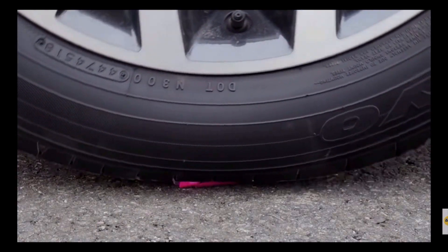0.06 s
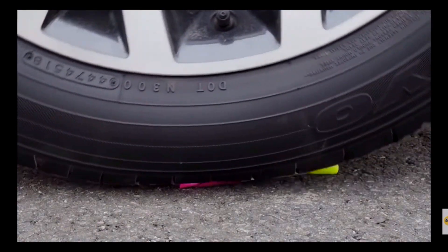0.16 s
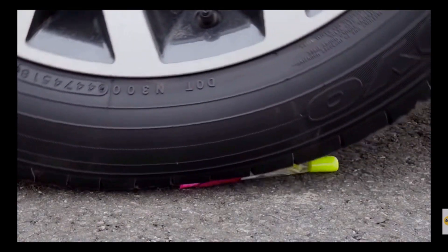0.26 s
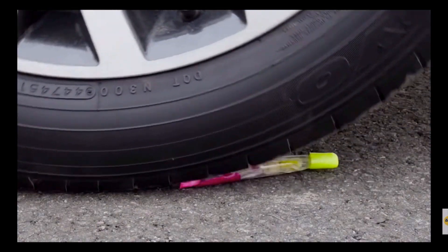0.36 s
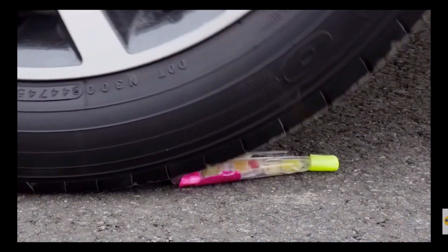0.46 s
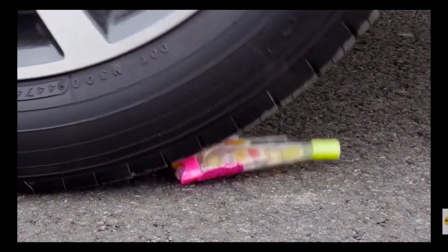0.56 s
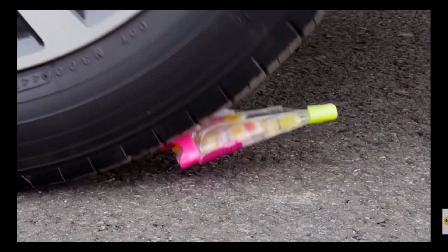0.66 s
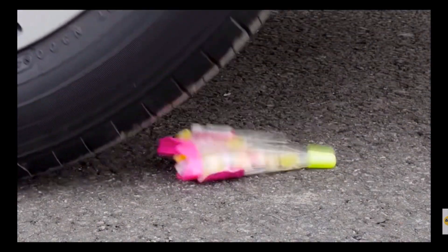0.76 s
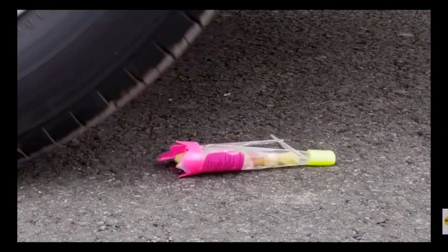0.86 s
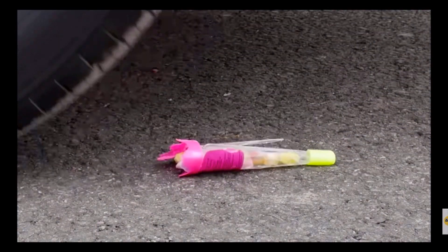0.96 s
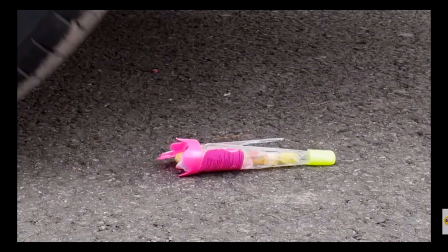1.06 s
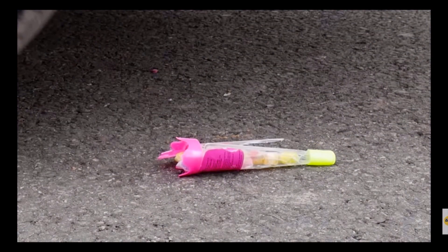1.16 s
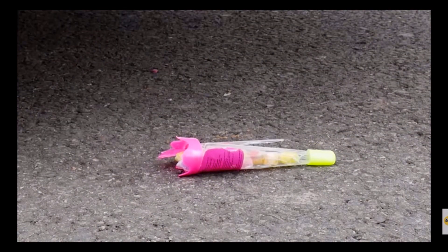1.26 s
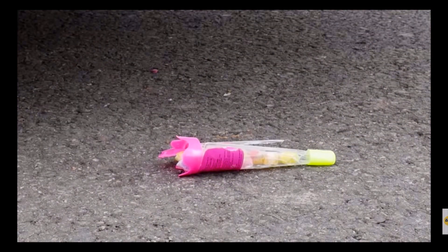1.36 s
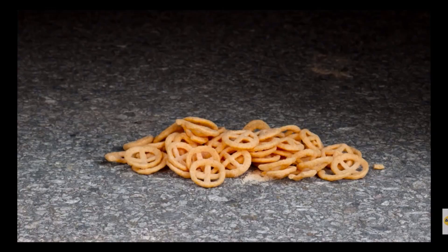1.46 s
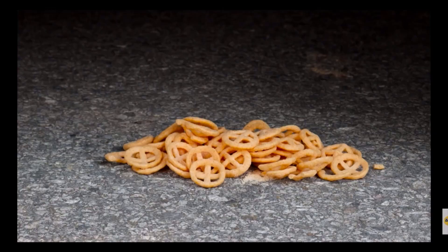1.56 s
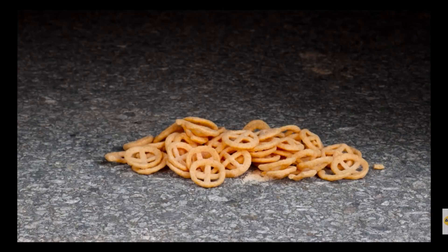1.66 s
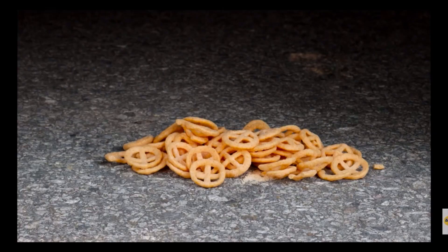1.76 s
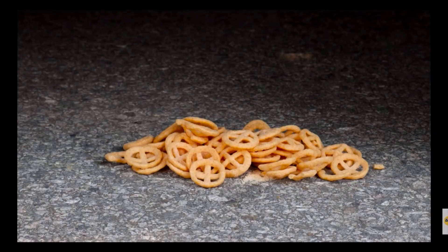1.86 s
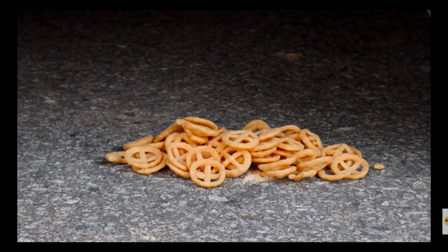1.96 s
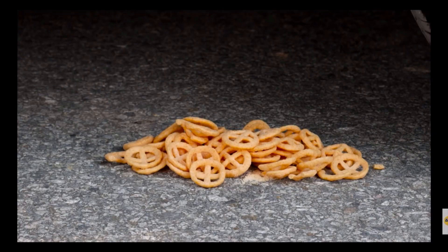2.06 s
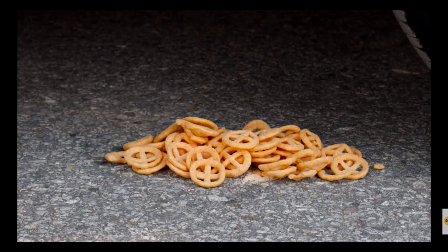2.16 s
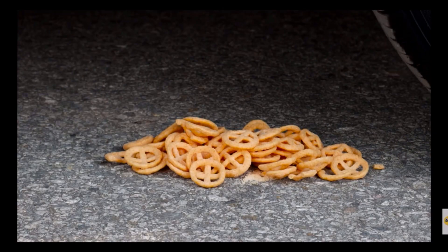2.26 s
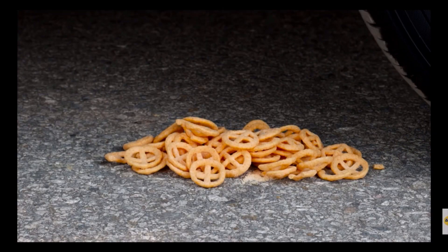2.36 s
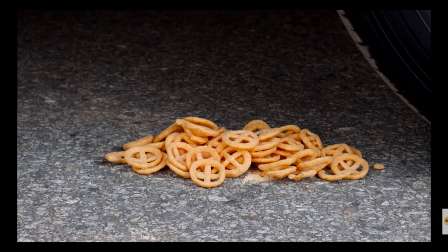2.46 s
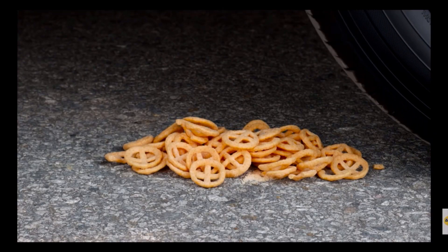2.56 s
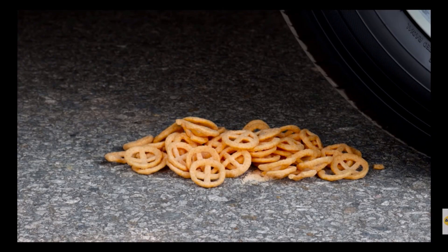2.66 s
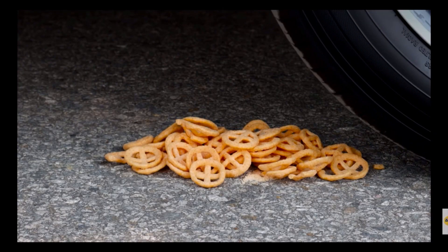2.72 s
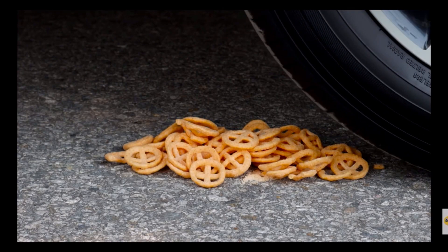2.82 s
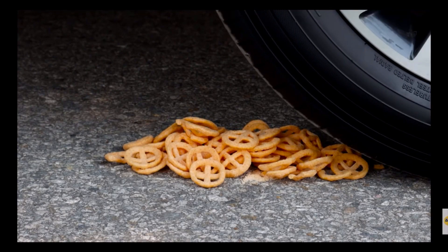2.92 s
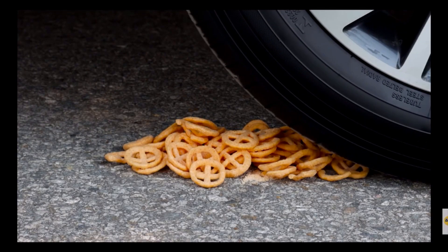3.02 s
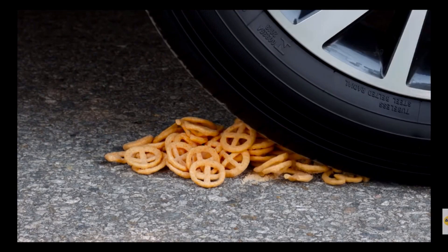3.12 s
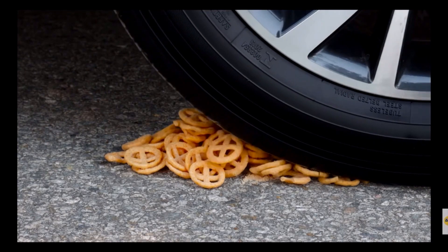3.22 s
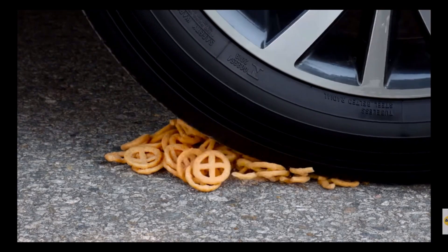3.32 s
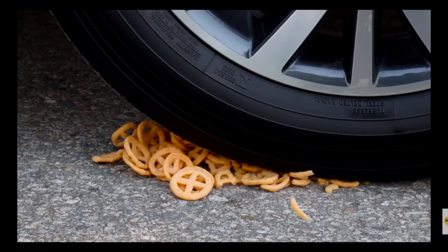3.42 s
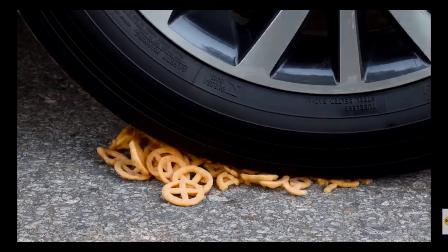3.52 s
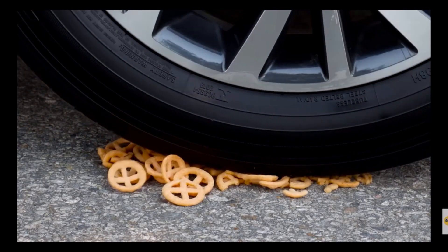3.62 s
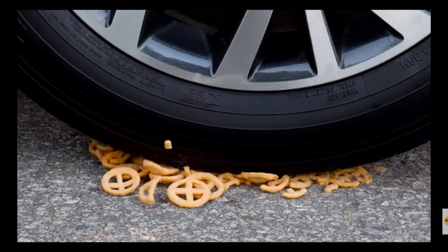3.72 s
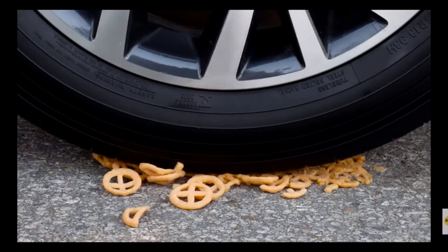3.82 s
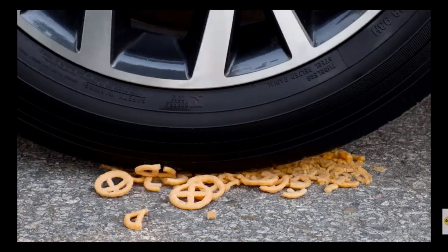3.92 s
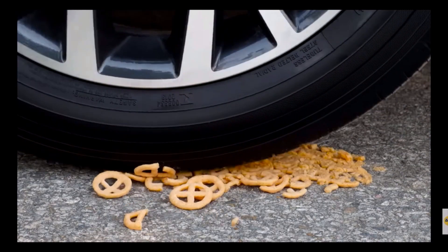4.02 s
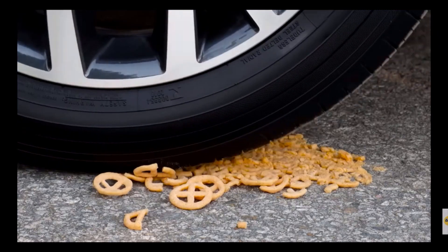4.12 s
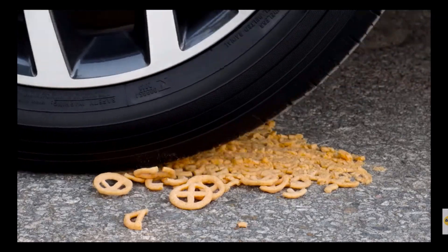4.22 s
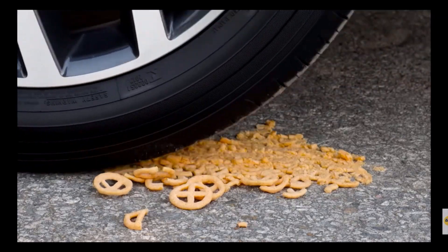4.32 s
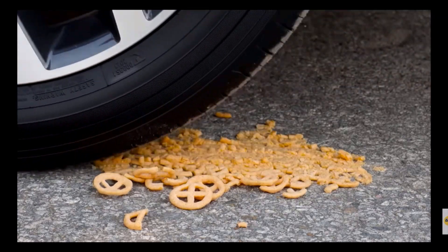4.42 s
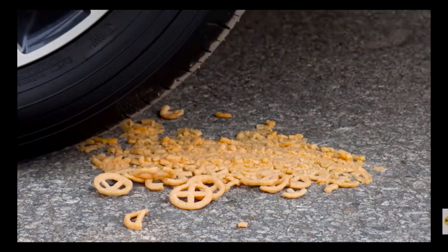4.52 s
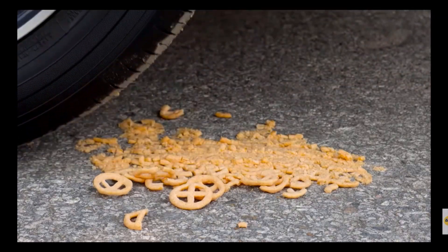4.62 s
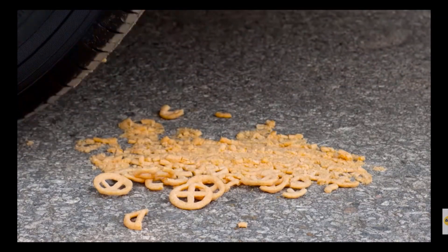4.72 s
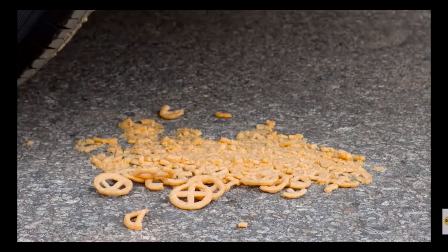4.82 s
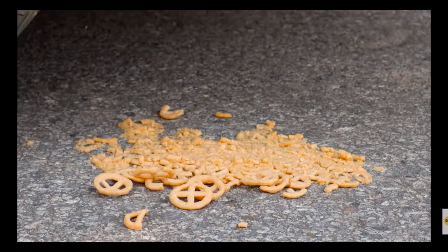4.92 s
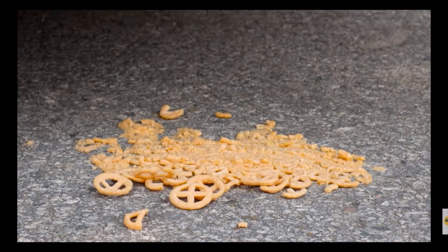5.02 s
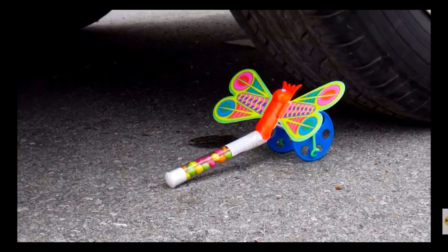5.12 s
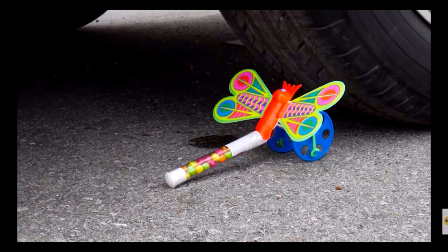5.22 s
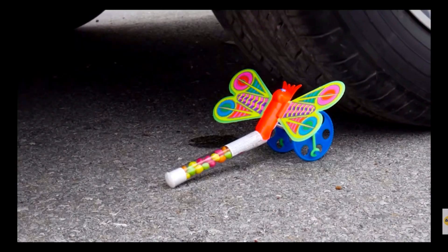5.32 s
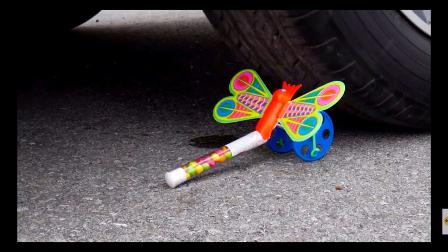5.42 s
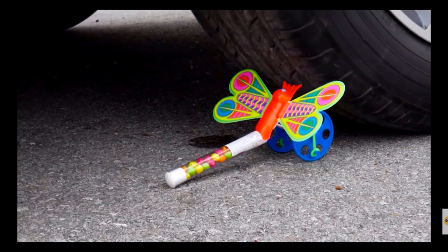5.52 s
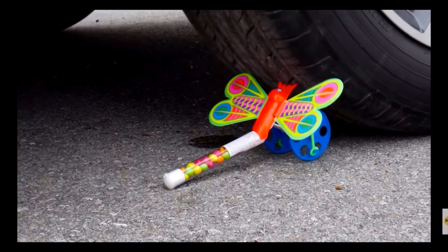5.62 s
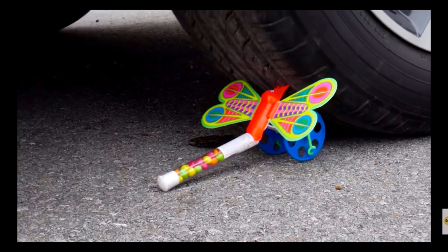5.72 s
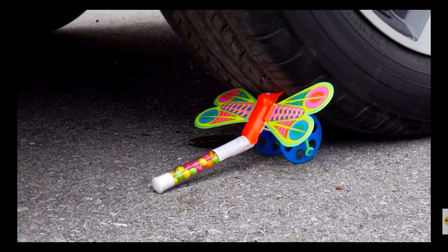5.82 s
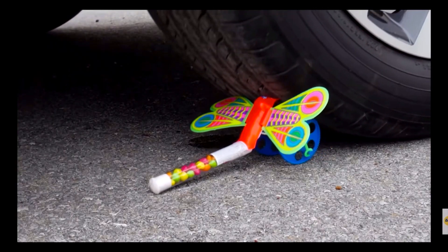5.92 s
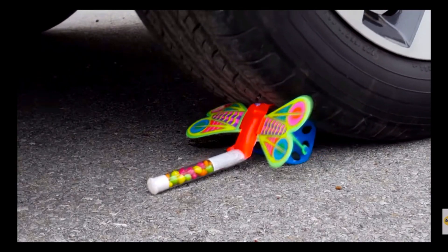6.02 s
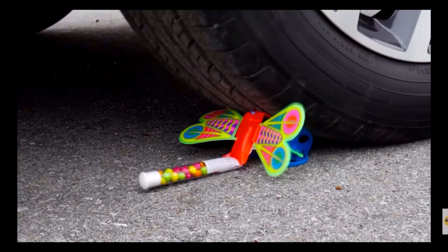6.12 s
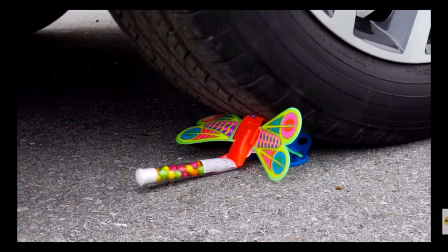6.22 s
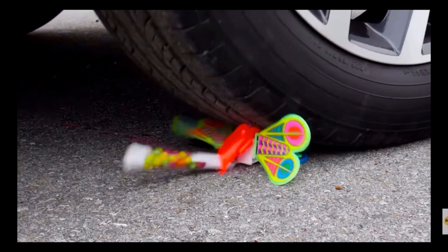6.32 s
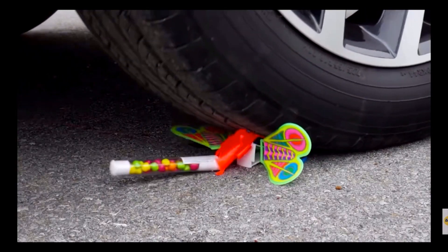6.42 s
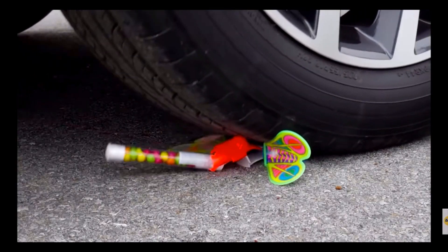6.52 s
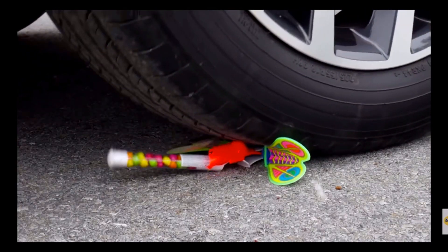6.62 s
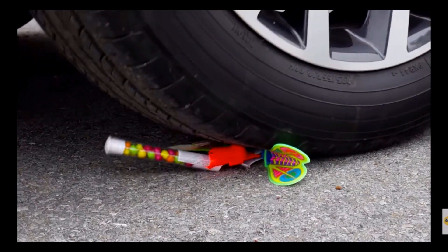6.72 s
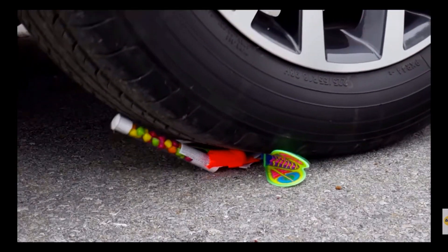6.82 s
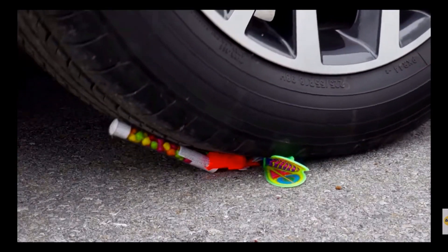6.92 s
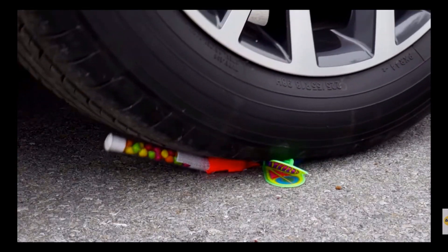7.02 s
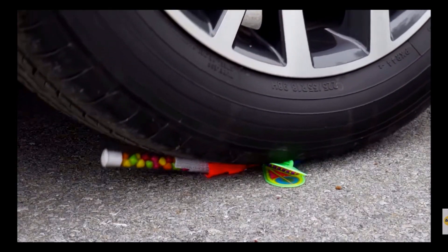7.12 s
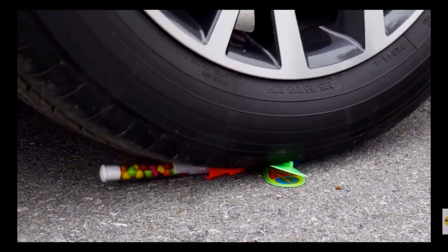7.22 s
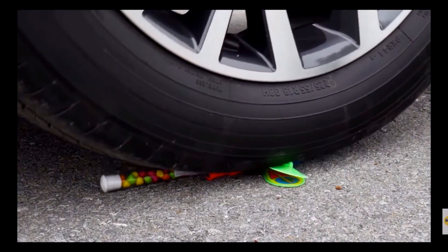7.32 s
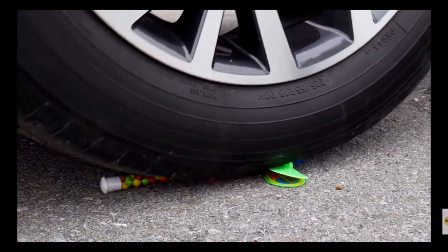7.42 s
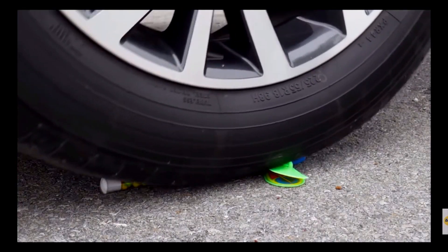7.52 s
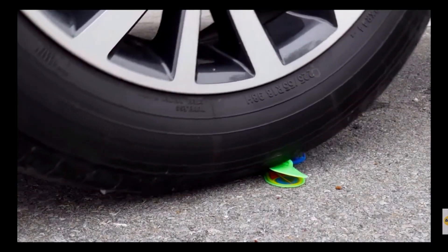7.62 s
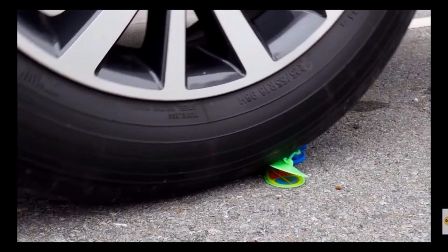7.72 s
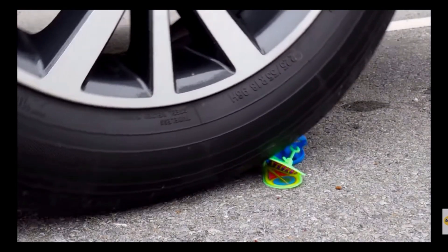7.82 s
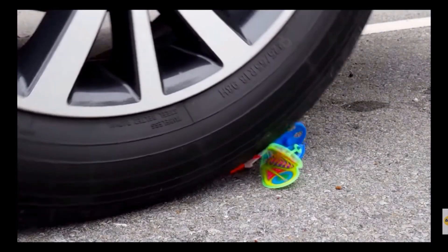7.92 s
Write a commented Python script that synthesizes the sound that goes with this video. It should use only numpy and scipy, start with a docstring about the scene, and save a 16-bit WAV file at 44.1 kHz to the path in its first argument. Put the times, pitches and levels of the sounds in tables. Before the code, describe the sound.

A car tyre rolls slowly over asphalt, grit crackling in the tread above a low rumble. It first cracks a plastic sweet tube, which springs free and clatters briefly on the ground. Next it grinds through a heap of pretzels in a loud, dense crunch. Last, a plastic toy squeaks faintly and breaks in a long run of sharp snaps. The sound is close, outdoors, with only a faint echo.

```python
"""Tyre crushing plastic and pretzels

In three scenes, one after the other, a car tyre rolls slowly over asphalt and crushes a plastic sweet tube, a
heap of pretzels and a plastic toy. Each gives way in swarms of tiny fractures and single sharp cracks; the
freed tube clatters on the ground. Underneath, grit crackles in the tread over the rumble, hum and groans of the
car. The yard adds a faint tail, and a fast limiter holds the loudest peaks."""
import sys
import numpy as np
from scipy import signal
from scipy.fft import rfft, irfft, next_fast_len
from scipy.io import wavfile
from scipy.ndimage import uniform_filter1d, minimum_filter1d

SR = 44100
rng = np.random.default_rng(int(sys.argv[2]) if len(sys.argv) > 2 else 0)


def to_wav(sig):
    """Store sig (one row per channel, or 1-D mono) as 16-bit WAV at the path in sys.argv[1].

    Samples outside -1..1 are clipped; the rate is SR.
    """
    pcm = np.clip(np.atleast_2d(sig), -1, 1) * 32767
    pcm = np.round(pcm).astype(np.int16)
    wavfile.write(sys.argv[1], SR, pcm.T)  # frames by channels


N = 351477
TIME = np.arange(N) / SR
TAPS = 2048
BINS = np.fft.rfftfreq(TAPS, 1 / SR)
BASS_HZ, SPLIT_HZ = 750, 3800  # crossovers: bass to body, body to treble
# the three scenes, one after the other, each with one object under the tyre: start_s, end_s
TUBE_PASS, PRETZEL_PASS, TOY_PASS = (0, 1.477), (1.477, 4.967), (4.967, 8)
# part of an object caves in: start_s, length_s, crunch_db, splinter_db
COLLAPSES = [(0, 0.039, -42.5, -53), (0.1, 0.032, -37.5, -48.5), (0.161, .035, -34.5, -45),
             (0.357, 0.39, -41, -55.5), (0.78, 0.18, -37, -51), (2.925, 0.05, -28, -44.5),
             (2.973, 0.059, -18.5, -37), (3.035, 1.06, -27.5, -32.5), (3.335, .05, -21, -37),
             (3.395, 0.056, -25, -38), (3.555, 0.072, -30, -33.5), (3.614, 0.052, -18.5, -32),
             (3.804, 0.045, -19.5, -37), (3.953, 0.066, -20, -42), (4.05, 0.068, -19.5, -43),
             (4.151, 0.068, -22, -38), (4.238, 0.061, -35, -49.5), (5.632, .07, -22.5, -36),
             (5.692, 0.044, -19.5, -26.5), (5.765, 0.058, -23, -33.5), (5.941, 0.1, -29.5, -43),
             (6.019, 0.026, -21, -28), (6.097, 0.13, -34, -40.5), (6.231, 0.047, -23.5, -32),
             (6.348, 0.13, -41.5, -48.5), (6.482, 0.027, -23, -33.5), (6.55, 0.12, -42, -48),
             (6.648, 0.092, -33.5, -43), (6.753, 0.055, -24.5, -33.5), (6.915, 0.15, -37.5, -46),
             (7.218, 0.11, -34.5, -46.5), (7.41, 0.035, -31.5, -46), (7.514, 0.077, -34, -43),
             (7.628, 0.033, -25.5, -37.5), (7.753, 0.015, -26, -28), (7.926, .05, -28.5, -39)]
# spectrum of a bright snap: frequency_hz, level_db
SNAP_TONE = [(1500, -22.5), (3000, -10.5), (4200, 4.5), (6500, -1), (8500, -11.5), (11000, -9.5),
             (15500, -27)]


def cracks(skirt=0.09, snap_tear=0.26, body_tear=0.4, air_hz=10500):
    """A first break and a ragged tear; the piece rings for a few cycles, damped by the rubber."""
    # single loud fractures: start_s, body_db, pitch_hz, width_octaves, snap_db
    fractures = [(.0565, -34, 2450, 0.43, -35), (.0706, -32, 1800, 2.7, -28),
                 (0.1078, -41, 1000, 0.43, -30.5), (0.1173, -14.5, 1520, 1.4, -31),
                 (.1287, -35, 1100, 1.1, -48), (0.1355, -28, 2250, 3.1, -27), (.1476, -25, 1100, 1.4, -48),
                 (.1688, -25, 2550, 0.27, -30), (0.1803, -18.5, 1500, 1.2, -27),
                 (0.2247, -38, 1900, .87, -34), (0.233, -34, 1720, .3, -34),
                 (0.2578, -12.5, 1880, 0.62, -28.5), (.3044, -28.5, 2030, .65, -39),
                 (0.3166, -26, 1300, 1.9, -40.5), (.3798, -26.5, 2500, 0.6, -37),
                 (0.4226, -27.5, 2250, 0.69, -33.5), (0.5377, -29, 2230, 0.36, -32.5),
                 (.6243, -33, 3000, 0.27, -42), (.7206, -44, 2300, .8, -46),
                 (.7765, -14.5, 2170, 0.34, -34.5), (3.044, -31, 2000, 1.2, -26.5),
                 (3.0615, -20, 2750, 0.68, -28), (3.0696, -19, 2230, .65, -28),
                 (3.0923, -18, 3000, 0.81, -29), (3.1235, -18, 2440, .54, -27.5),
                 (3.153, -24, 2400, .8, -26), (3.1675, -20, 2300, 0.68, -31), (3.2073, -19, 1800, .65, -33),
                 (3.2719, -20, 2200, 1.1, -40), (3.3367, -16, 2130, .8, -42), (3.4186, -18, 2180, 0.8, -32),
                 (3.452, -22, 2240, 0.69, -30), (3.6882, -12, 1500, 0.29, -49),
                 (3.726, -23, 1550, 0.87, -43), (3.7749, -14.5, 1300, 0.4, -41),
                 (3.8033, -17.5, 1420, 1.1, -33), (3.9673, -18.5, 1370, 1.1, -40),
                 (4.0382, -21, 1380, .9, -42), (4.078, -14.5, 1350, 1.4, -42),
                 (4.1451, -16.5, 1300, 1.2, -33), (4.1674, -16.5, 1000, 0.56, -32),
                 (4.1826, -15, 1100, 0.58, -41), (4.255, -24.5, 1960, .44, -61),
                 (4.3273, -34, 1250, 1.15, -70), (4.549, -44, 2800, 1.3, -50),
                 (5.631, -28, 2100, 0.79, -48), (5.7497, -18, 2480, 0.08, -35),
                 (5.8602, -13.5, 1700, 0.73, -35), (5.8769, -22.5, 2960, 0.55, -30.5),
                 (5.8934, -42, 2000, 1, -30.5), (6.033, -16.5, 1400, 1.6, -34),
                 (6.049, -20, 1680, 0.65, -28), (6.068, -21, 2980, .2, -33), (6.1042, -20, 2750, 0.57, -29),
                 (6.1106, -17.5, 2430, 1.05, -27), (6.1387, -11.5, 2080, 0.97, -26),
                 (6.1629, -24, 1300, 1.1, -43), (6.2488, -18, 2900, 0.66, -32),
                 (6.2932, -12.5, 2020, 0.23, -26), (6.3096, -18, 2670, .42, -26),
                 (6.335, -22, 2080, 0.5, -28), (6.356, -27.5, 1500, 0.63, -27),
                 (6.4535, -27.5, 1330, 1.8, -46), (6.488, -18.5, 1860, 0.64, -27),
                 (6.5274, -19, 2780, 0.32, -29), (6.54, -18, 2220, .46, -26.5),
                 (6.6195, -24.5, 2230, 0.44, -39), (6.709, -21.5, 2300, 0.31, -29),
                 (6.7747, -12.5, 2130, 0.82, -25.5), (6.7909, -17, 2920, .6, -26.5),
                 (6.8536, -10.5, 1720, .71, -34), (6.9187, -20, 1730, 0.71, -46),
                 (6.949, -19, 1800, .7, -25), (7.0347, -16, 3350, 1.2, -45),
                 (7.1556, -21.5, 3040, 1.2, -38), (7.2388, -28, 1950, 0.34, -36),
                 (7.3089, -20.5, 1950, 0.65, -29), (7.3778, -15, 2370, 0.25, -38),
                 (7.4221, -21.5, 1850, .47, -31), (7.4781, -28, 2800, 0.61, -30),
                 (7.502, -23.5, 1350, 1.3, -36), (7.5233, -21.5, 1820, 0.61, -36),
                 (7.5557, -22, 2050, 2.4, -31), (7.5673, -21, 1890, .51, -35),
                 (7.5754, -25, 2100, 0.52, -31), (7.6286, -18.5, 1200, 1.4, -26.5),
                 (7.6335, -19.5, 3150, 0.91, -25), (7.658, -15, 2240, 0.48, -49),
                 (7.8204, -17.5, 1950, 0.33, -41), (7.8424, -15.5, 2200, 0.3, -25.5),
                 (7.8552, -18, 2070, .22, -53), (7.8704, -21.5, 2400, 1.1, -46),
                 (7.881, -15, 1600, 0.45, -46), (7.8987, -22.5, 1780, 0.81, -32),
                 (7.9093, -20, 1880, 0.11, -33), (7.9203, -22, 1720, 0.33, -34),
                 (7.9423, -22.5, 1650, 0.74, -29)]
    # spectrum of the tyre's thud: frequency_hz, level_db
    thud_tone = [(30, -18), (110, -1.5), (300, 2), (600, 4.5), (1000, -28), (2000, -61)]
    # how each material breaks: thud_db, air_db, lone_tear_s, collapse_tear_s
    tube, pretzel, toy = (-41, -1, .0018, .002), (-48, -5, .0025, .004), (-39, -1.5, .0019, .0038)
    out, t = np.zeros(N), np.arange(TAPS) / SR
    first_break = 1. * (t == 0)
    window_gain = np.sqrt(.005 * SR / TAPS)  # levels are rms over 5 ms
    body_band = above(880, order=6) * below(SPLIT_HZ, order=5)
    thud = unit(colour(first_break, tone(thud_tone)))
    for start, body_db, hz, octaves, snap_db in fractures:
        material = tube if start < TUBE_PASS[1] else pretzel if start < PRETZEL_PASS[1] else toy
        thud_db, air_db, lone_tear_s, collapse_tear_s = material
        in_collapse = any(0 <= start - onset <= length for onset, length, _, _ in COLLAPSES)
        tear_s = collapse_tear_s if in_collapse else lone_tear_s
        sparse_noise = rng.standard_normal(TAPS) * (rng.random(TAPS) < .25)
        tear = snap_tear * sparse_noise * np.exp(-(t / tear_s) ** 2)
        piece = (np.exp(-(np.log2((BINS + 1) / hz) / octaves) ** 2) + skirt) * body_band
        # faint snaps are the airiest; sharper ones free more load, so the tyre thuds harder
        sharpness_db = snap_db + 28
        edge = tone(SNAP_TONE) * amp((air_db - .5 * sharpness_db) * above(air_hz))
        sound = amp(body_db) * unit(colour(first_break + body_tear * tear, piece))
        sound += amp(snap_db) * unit(colour(first_break + tear, edge))
        sound += amp(thud_db + 1.5 * sharpness_db) * thud
        add(out, start, window_gain * sound)
    return out


def crushed_objects():
    """Tube, pretzels and toy crumble in turn, each with its own grain and colour."""
    # spectrum of each material: frequency_hz, level_db
    tube_tone = [(200, -25), (400, -9), (750, -10), (1100, -7.5), (1600, -3.5), (2300, 0), (3200, -3),
                 (4000, -9.5), (6500, -24), (8500, -27), (11000, -27), (15500, -50)]
    pretzel_tone = [(200, -27), (400, 5.5), (750, -5.5), (1100, 1.5), (1600, 1), (2300, 4.5), (3200, -3.5),
                    (4000, -17), (6500, -24.5), (8500, -28.5), (11000, -41), (15500, -50)]
    toy_tone = [(200, -50), (400, 1), (750, -6.5), (1100, -10), (1600, 0.5), (2300, 1.5), (3200, 2),
                (4000, -6), (6500, -16), (8500, -27), (11000, -24), (15500, -56)]
    tube = crush(TUBE_PASS, tube_tone, grains(per_s=590, spread_db=3, decay_s=.0004, wash=1),
                 crunch_db=2, splinter_db=3.5, clump_db=2.5, chip_db=-16)
    pretzels = crush(PRETZEL_PASS, pretzel_tone,
                     grains(per_s=1100, spread_db=3, decay_s=.00061, wash=.49),
                     crunch_db=-.9, splinter_db=1, clump_db=1.2, chip_db=-10)
    toy = crush(TOY_PASS, toy_tone, grains(per_s=1800, spread_db=3, decay_s=.00024, wash=.62),
                crunch_db=1, splinter_db=.5, clump_db=1.15, chip_db=-14.5)
    return tube + pretzels + toy


def crush(span, material, breaks, crunch_db, splinter_db, clump_db, chip_db):
    """A swarm of fractures, coming in clumps, sounds the material's body and its bright splinters."""
    crunch, splinters = collapse_envelopes(span)
    pieces = unit(breaks) + amp(chip_db) * chips(per_s=150, spread_db=3, cycles=3.8)
    body = steady(colour(pieces, tone(material) * above(BASS_HZ, order=4) * below(SPLIT_HZ)))
    treble = steady(colour(breaks, tone(material) * above(SPLIT_HZ)))
    clumps = unit(amp(clump_db * drift(size=350)))
    return clumps * (amp(crunch_db) * crunch * body + amp(splinter_db) * splinters * treble)


def collapse_envelopes(span, attack_s=0.018, release_db_per_s=337):
    """Crunch and splinter gains: each collapse builds, holds while the rubber presses, and dies away."""
    power = np.zeros((2, N))
    for start, length, crunch_db, splinter_db in COLLAPSES:
        t = np.arange(0, length + .25, 1 / SR)
        shape = np.minimum(t / attack_s, 1) * amp(-release_db_per_s * np.maximum(t - length, 0))
        add(power[0], start, (amp(crunch_db) * shape) ** 2)
        add(power[1], start, (amp(splinter_db) * shape) ** 2)
    return np.sqrt(power) * during(span)


def grains(per_s, spread_db, decay_s, wash, count=32):
    """Tiny breaks of random size and pitch, each a short burst, over a wash of countless smaller ones."""
    size = amp(spread_db * np.minimum(rng.exponential(1, N), 4)) * (rng.random(N) < per_s / SR)
    kind, t = rng.integers(0, count, N), np.arange(256) / SR
    bursts = rng.standard_normal((count, len(t))) * np.exp(-t / decay_s)
    # each crumb rings briefly at a random pitch between 1 and 12 kHz
    pitch = np.geomspace(1000, 12000, count)[:, None]
    rings = np.sqrt(pitch / 3000) * np.sin(2 * np.pi * pitch * t) * np.exp(-pitch * t / 1.8)
    onsets = np.flatnonzero(size)
    sounds = size[onsets, None] * (bursts + rings)[kind[onsets]]
    positions = onsets[:, None] + np.arange(len(t))
    breaks = np.bincount(positions.ravel(), sounds.ravel(), N)[:N]
    return unit(breaks) + wash * rng.standard_normal(N)


def chips(per_s, spread_db, cycles, low_hz=1250, high_hz=3400, count=24):
    """Larger pieces snap off at random moments; each rings for a few cycles at its own pitch."""
    size = amp(spread_db * np.minimum(rng.exponential(1, N), 3)) * (rng.random(N) < per_s / SR)
    kind, pitches = rng.integers(0, count, N), np.geomspace(low_hz, high_hz, count)
    out, t = np.zeros(N), np.arange(512) / SR
    for onset in np.flatnonzero(size):
        turns = pitches[kind[onset]] * t
        add(out, onset / SR, size[onset] * np.sin(2 * np.pi * turns) * np.exp(-turns / cycles))
    return unit(out)


def tube_clatter(gain_db=-7, clack_db=-2, clack_s=0.0031, buzz=0.88, wet_db=-10):
    """Each knock is a dry clack that rings the hard tube; its split walls buzz, smearing the modes."""
    # the freed tube springs up and bounces on the ground: start_s, level_db
    knocks = [(.7995, -24), (.8095, -27), (0.8227, -15), (.8247, -11.5), (0.8268, -16), (.8291, -20),
              (0.8636, -29), (.8695, -22), (.9125, -26.5)]
    # resonances of the tube: pitch_hz, level_db, t60_s
    tube_modes = [(1250, -6, 0.017), (2540, 2, 0.017), (3240, -1.5, 0.017), (4730, -10, .04),
                  (6120, 0, 0.015), (7030, -5.5, 0.027), (7340, -15, 0.018), (8300, -13, 0.035),
                  (9260, -13, 0.032), (11160, -32, .05)]
    out, t = np.zeros(N), np.arange(SR // 5) / SR
    count = len(tube_modes)
    for start, db in knocks:
        weights = rng.uniform(0.28, 1.16, count) * rng.choice([-1, 1], count)
        smear = np.cumsum(rng.standard_normal((count, len(t))), 1) * buzz * np.sqrt(1000 / SR)
        ringing = sum(weight * amp(mode_db - 60 * t / t60) * np.sin(2 * np.pi * hz * t + phase)
                      for weight, phase, (hz, mode_db, t60) in zip(weights, smear, tube_modes))
        burst = rng.standard_normal(len(t)) * np.exp(-t / clack_s)
        clack = colour(burst, above(900) * below(7200, order=3))
        add(out, start, amp(db + gain_db) * (ringing + amp(clack_db) * clack))
    return colour(out + amp(wet_db) * yard(out, t60=.11), above(140, order=2))


def rolling_car(under_car=0.43, flutter_db=1.2):
    """Grit crackles under the tread and echoes beneath the car, over a low rumble."""
    # spectrum of the rolling car: frequency_hz, level_db
    roll_tone = [(30, -33), (90, -25), (200, -16), (400, -9), (750, -5.5), (1100, -2.5), (1600, 0.5),
                 (2300, 1.5), (3200, -3.5), (4000, -15), (6500, -26), (8500, -33.5), (11000, -38.5),
                 (15500, -49)]
    grit_db, rumble_db = rolling_levels()
    crackle = grains(per_s=1800, spread_db=2.5, decay_s=0.00065, wash=1)
    grit = colour(crackle, tone(roll_tone) * above(BASS_HZ))
    grit = steady(grit + under_car * yard(grit, t60=0.23), size=3000)
    grit *= amp(flutter_db * drift(size=900))
    rumble = unit(colour(rng.standard_normal(N), tone(roll_tone) * below(BASS_HZ)))
    return amp(grit_db + .14) * grit + amp(rumble_db - 1) * rumble


def rolling_levels():
    """Fader curves in dB for grit and rumble through the three passes."""
    # the roll over each object: time_s, grit_db, rumble_db
    tube_roll = [(0, -40.5, -51), (.25, -48, -53.5), (.34, -39, -51), (.98, -41, -48), (1.23, -36, -43),
                 (1.477, -36.5, -44.5)]
    pretzel_roll = [(1.477, -30.5, -41.5), (1.9, -30.5, -41), (2.9, -32, -43.5), (3.02, -28.5, -39),
                    (3.25, -22.5, -48), (4.19, -25.5, -42), (4.29, -44.5, -50.5), (4.48, -45.5, -52.5),
                    (4.967, -37, -46.5)]
    toy_roll = [(4.967, -30, -43), (5.7, -29.5, -42), (6.04, -33, -46), (6.38, -50, -49.5),
                (6.7, -40.5, -50), (7.36, -37, -52.5), (7.68, -27, -43), (7.8, -26.5, -49),
                (7.88, -38.5, -58)]
    levels = np.zeros((2, N))
    for span, rows in (TUBE_PASS, tube_roll), (PRETZEL_PASS, pretzel_roll), (TOY_PASS, toy_roll):
        times, *curves = np.transpose(rows)
        levels += during(span) * np.array([np.interp(TIME, times, db) for db in curves])
    return levels


def drones():
    """The engine and loaded tyre drone and groan, and the toy's wheels squeak."""
    # narrow noise-fed resonances that swell and fade: start_s, end_s, pitch_hz, width_hz, level_db
    swells = [(1.0, 1.5, 186, 17, -56.5), (1.3, 2.0, 427, 13, -49), (1.82, 2.07, 478, 84, -44),
              (1.399, 3.02, 1063, 310, -38.5), (2.399, 3.107, 90.5, 9.6, -68.5),
              (4.3, 5.01, 321, 55.5, -58), (4.97, 5.66, 320, 40, -53.5), (4.992, 5.5, 2637, 82, -41),
              (5.61, 5.73, 544, 100, -37), (5.98, 6.09, 573, 120, -41), (6.25, 7.1, 206, 14, -61),
              (7.58, 7.85, 550, 130, -43.5)]
    out = np.zeros(N)
    for start, end, hz, width_hz, db in swells:
        count = next_fast_len(max(round((end - start) * SR), 256))
        hiss = rng.standard_normal(3 * SR)[:count]
        detune = (np.fft.rfftfreq(count, 1 / SR) - hz) / (width_hz / 2)
        groan = irfft(rfft(hiss) / (1 + detune ** 2), count)
        add(out, start, amp(db) * unit(groan) * signal.windows.tukey(count, .4))
    return out


def stones():
    """Stone chips tick faintly and brightly in the tread, following the level of the grit."""
    grit_db, _ = rolling_levels()
    offset_db = -38 * (during(TUBE_PASS) + during(PRETZEL_PASS)) - 29.5 * during(TOY_PASS)
    ticks = grains(per_s=500, spread_db=2.5, decay_s=.0004, wash=.6)
    return amp(grit_db + offset_db) * unit(colour(ticks, tone(SNAP_TONE) * above(6500, order=2)))


def engine_hum(waver=0.0203, follow=0.71):
    """The engine hums faintly, wavering in pitch and level and swelling with the rumble."""
    # engine partials: pitch_hz, level_db
    partials = [(89, -70.5), (179, -68)]
    _, rumble_db = rolling_levels()
    clock = np.cumsum(1 + waver * drift(size=3000)) / SR
    hum = sum(amp(db) * (1 + .5 * drift(size=2500)) * np.sqrt(2) * np.sin(2 * np.pi * hz * clock)
              for hz, db in partials)
    return hum * unit(amp(follow * rumble_db))


def yard(x, t60, delay_s=.003):
    """Scattered echoes from the ground, the wheel arch and nearby walls."""
    t = np.arange(SR // 2) / SR
    reflections = rng.choice([-1., 1.], len(t)) * (rng.random(len(t)) < .1)
    tail = reflections * amp(-60 * t / t60) * (t > delay_s)
    return signal.oaconvolve(x, tail / np.linalg.norm(tail))[:N]


def amp(db):
    """Decibels to gain."""
    return 10 ** (np.asarray(db) / 20)


def unit(x):
    """Scales to rms 1."""
    return x / np.sqrt(np.mean(x ** 2) + 1e-20)


def tone(points):
    """EQ curve through (Hz, dB) points, as a gain for each bin."""
    hz, db = np.transpose(points)
    return amp(np.interp(np.log(BINS + 1), np.log(hz), db))


def above(hz, order=8):
    """High-pass curve."""
    return 1 / np.sqrt(1 + (hz / (BINS + 1)) ** (2 * order))


def below(hz, order=8):
    """Low-pass curve."""
    return 1 / np.sqrt(1 + (BINS / hz) ** (2 * order))


def colour(x, gain):
    """Applies an EQ curve with minimum phase, so nothing rings ahead of an attack."""
    log_gain = np.log(np.maximum(gain / gain.max(), 1e-5))
    mirrored = np.r_[log_gain, log_gain[-2:0:-1]]
    impulse = gain.max() * np.fft.ifft(np.exp(np.conj(signal.hilbert(mirrored)))).real
    return signal.oaconvolve(x, impulse)[:len(x)]


def steady(x, size=1100):
    """Holds the short-term rms at 1 and keeps the fine grain."""
    power = uniform_filter1d(uniform_filter1d(x ** 2, size), size)
    return x / np.sqrt(np.abs(power) + 1e-12)


def drift(size):
    """Random modulation of rms 1 that changes over about size samples."""
    return unit(uniform_filter1d(uniform_filter1d(rng.standard_normal(N), size), size))


def during(span):
    """Gate: 1 while this pass lasts, else 0."""
    return (TIME >= span[0]) * (TIME < span[1])


def add(mix, start_s, sound):
    """Lays a sound into the mix."""
    part = mix[max(round(start_s * SR), 0):][:len(sound)]
    part += sound[:len(part)]


def scene():
    """The breaking objects and their short echoes over the bed of the car, in mono."""
    swarms = crushed_objects()
    snaps = cracks() + tube_clatter()
    echoes = amp(-14) * yard(swarms, t60=0.2) + amp(-14.5) * yard(snaps, t60=0.24)
    bed = rolling_car() + engine_hum() + stones() + drones()
    return (swarms + snaps + echoes + bed)[None]


def record(dry, ceiling=.7, hold_samples=21, cutoff_hz=16300):
    """Microphone colour, a fast limiter on the peaks, and a steep high cut."""
    # peaks and dips of the microphone: centre_hz, width_hz, gain_db
    mic_bands = [(654, 29, 4), (800, 151, -8.5), (996, 193, 2.5), (1500.0, 62, -4), (3164, 505, 3),
                 (5583, 440, -12), (6414, 1270, 13.5), (10070, 250, 4), (10820, 290, -6), (11410, 176, 9),
                 (12100, 640, -12), (12780, 260, -9), (13600, 300, -1), (15900, 500, -10)]
    mic_db = sum(db * np.exp(-((BINS - hz) / width) ** 2) for hz, width, db in mic_bands)
    heard = colour(dry[0], amp(mic_db))
    allowed_gain = 1 / (1 + (heard / ceiling) ** 8) ** (1 / 8)
    limited = heard * uniform_filter1d(minimum_filter1d(allowed_gain, hold_samples), hold_samples)
    high_cut = signal.firwin(511, cutoff_hz, window=("kaiser", 9), fs=SR)
    return signal.oaconvolve(limited, high_cut, "same")[None]


dry = scene()
out = record(dry)
to_wav(out)
```